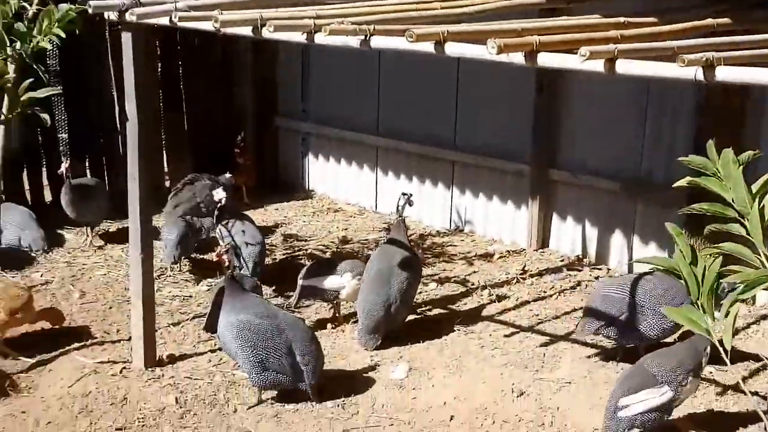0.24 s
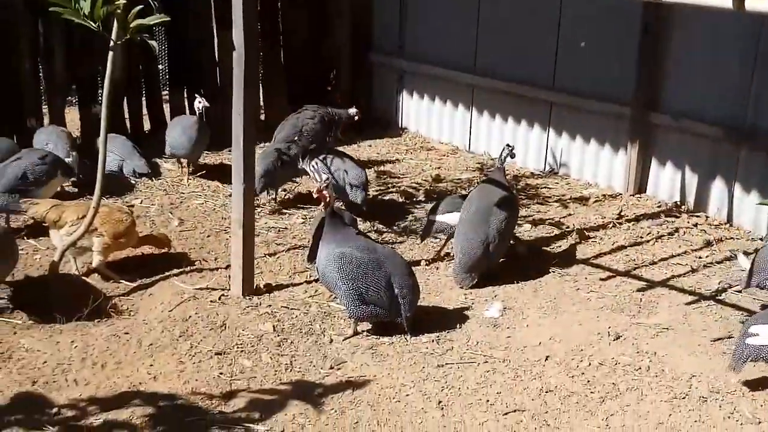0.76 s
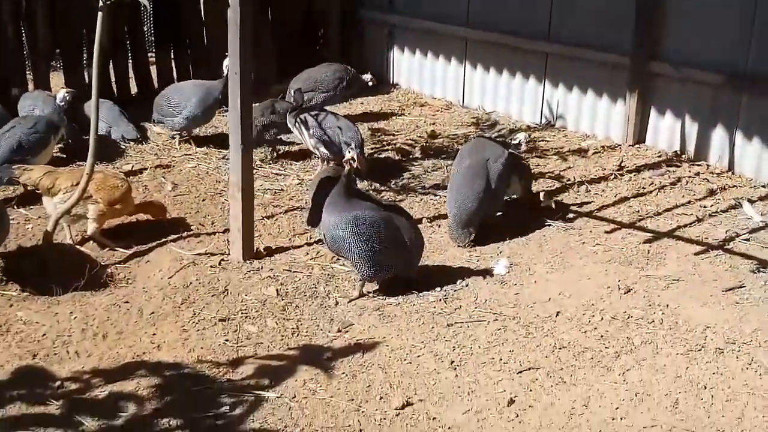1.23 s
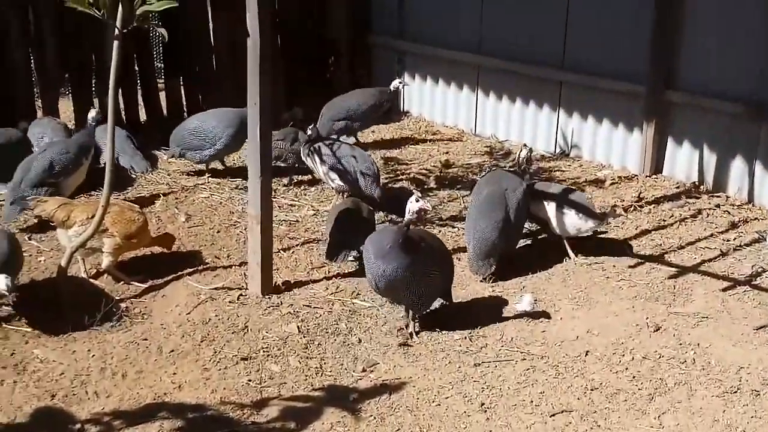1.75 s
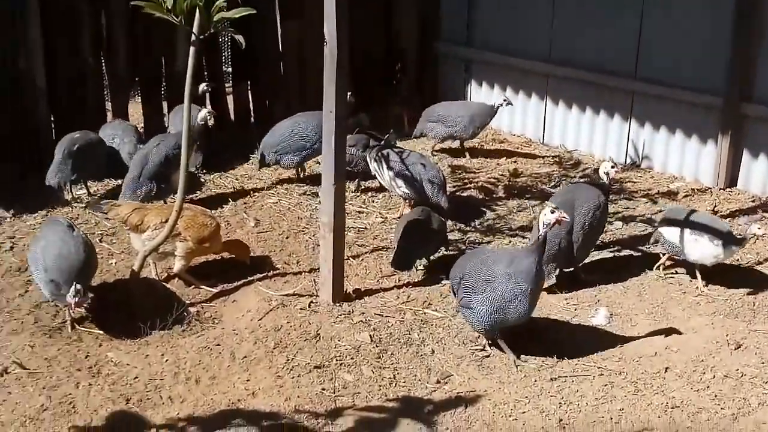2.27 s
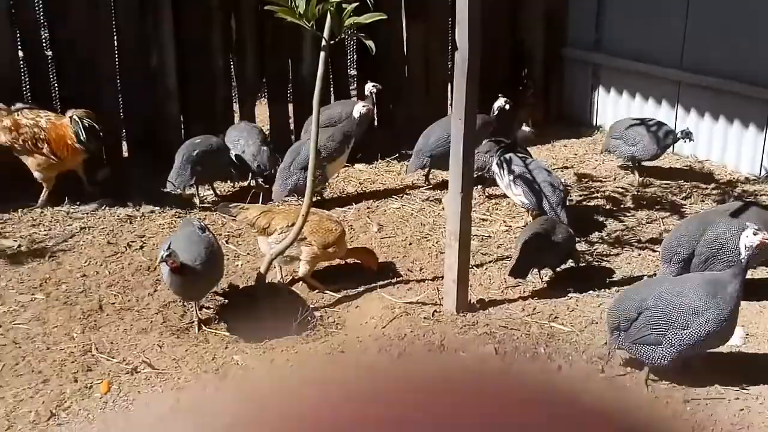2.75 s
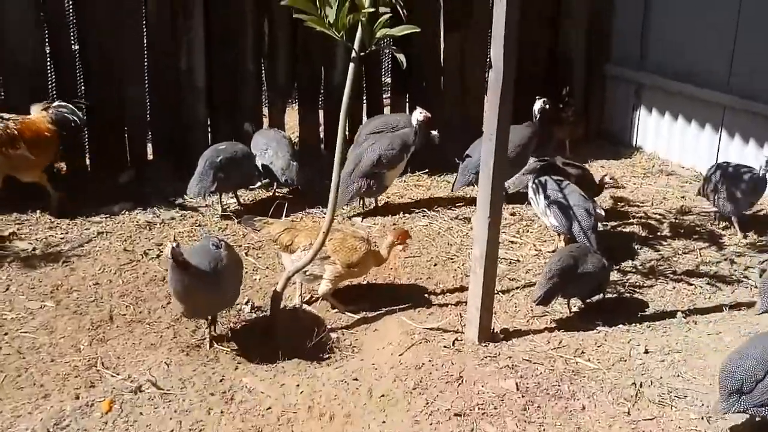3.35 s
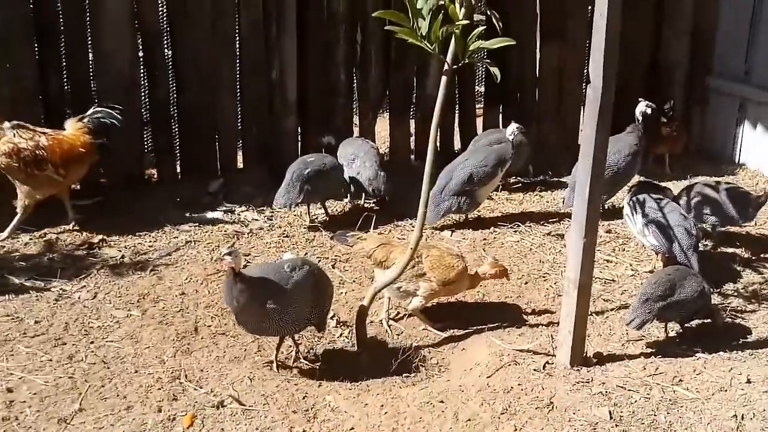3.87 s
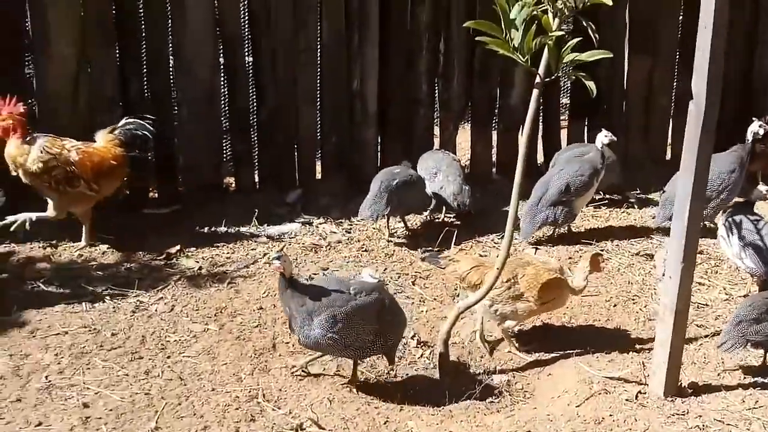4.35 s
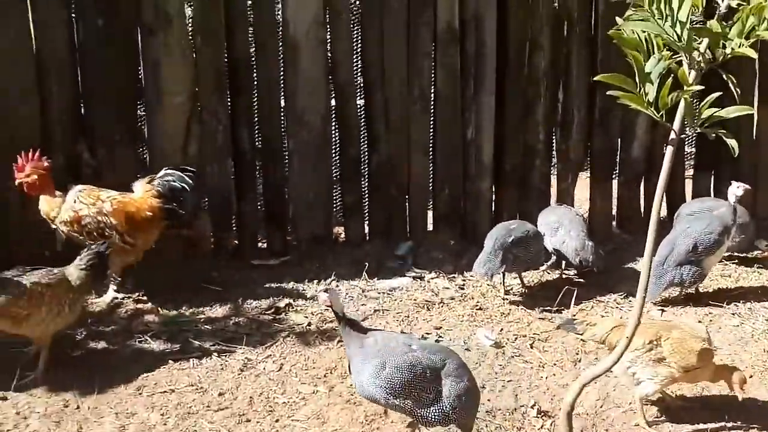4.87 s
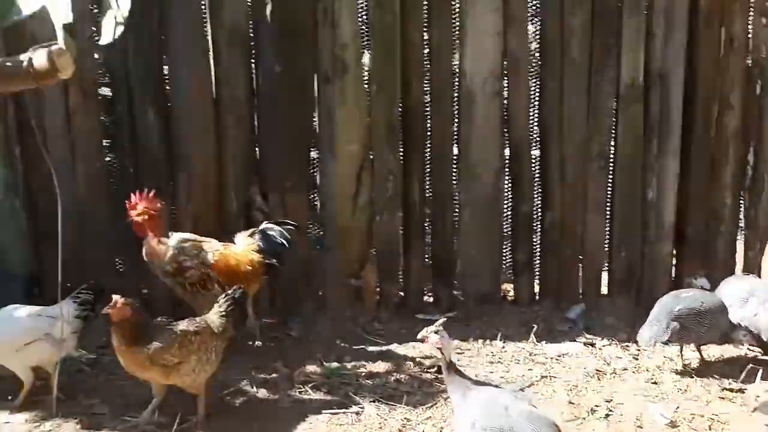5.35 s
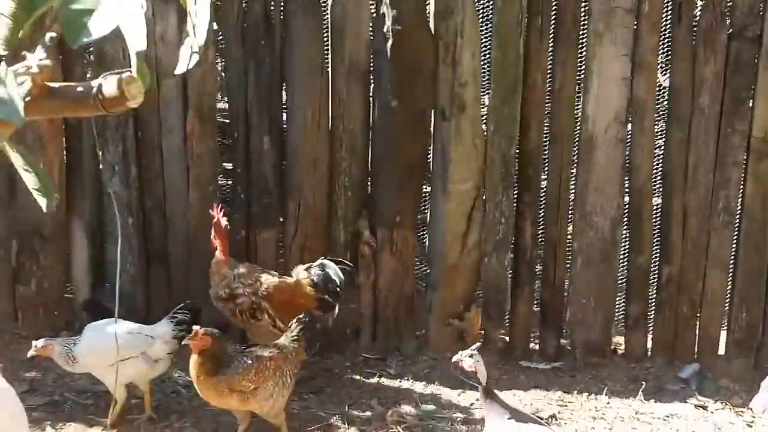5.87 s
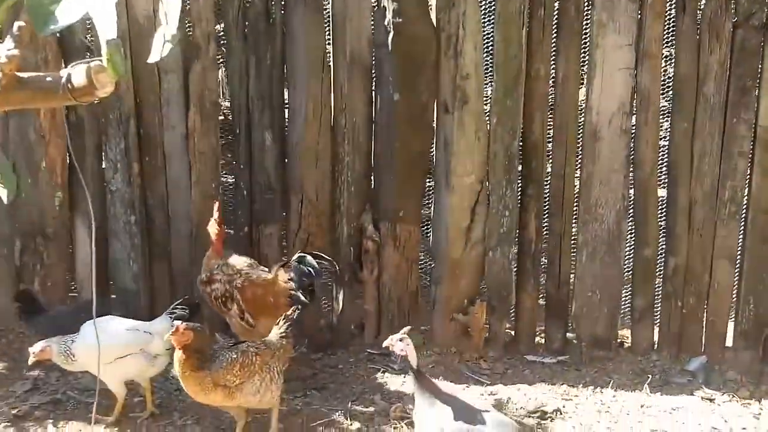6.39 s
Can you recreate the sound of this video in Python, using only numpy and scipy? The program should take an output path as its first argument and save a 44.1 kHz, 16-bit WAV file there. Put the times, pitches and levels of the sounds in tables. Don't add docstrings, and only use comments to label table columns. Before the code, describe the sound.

A guineafowl flock cackles nonstop in a fenced dirt yard, whistled syllables breaking into harsh rasps over faint hen clucks and light wind rumble.

```python
import sys
import numpy as np
from scipy import signal
from scipy.fft import rfft, irfft, next_fast_len
from scipy.io import wavfile
from scipy.ndimage import uniform_filter1d

SR = 44100
rng = np.random.default_rng(int(sys.argv[2]) if len(sys.argv) > 2 else 0)


def convert_level_to_amplitude(level_db):
    exponent = np.asarray(level_db, float) / 20
    return 10 ** exponent


def wav_out(sig):
    wavfile.write(sys.argv[1], SR, np.round(np.clip(np.atleast_2d(sig).T, -1, 1) * 32767).astype(np.int16))


N = 291942


def evened(x):
    return x / np.sqrt(np.mean(x ** 2) + 1e-20)


def read(points, hz):
    f, value = np.transpose(points)
    return np.interp(np.log(hz + 1), np.log(f + 1), value)


def add(mix, s, sound):
    part = mix[round(s * SR):][:len(sound)]
    part += sound[:len(part)]


def drift(count, hz):
    size = max(int(SR / hz), 1)
    smooth = uniform_filter1d(rng.standard_normal(count), size)
    return evened(uniform_filter1d(smooth, size))


def coloured(x, points):
    size = next_fast_len(len(x))
    gain = convert_level_to_amplitude(read(points, np.fft.rfftfreq(size, 1 / SR)))
    return irfft(rfft(x, size) * gain, size)[:len(x)]


def resonate(x, hz, width_hz):
    turn = np.exp(2j * np.pi * np.cumsum(hz * np.ones(len(x))) / SR)
    r = np.exp(-np.pi * abs(width_hz) / SR)
    low = signal.lfilter([(1 - r) ** 2], np.poly([r, r]), x / turn)
    return evened((turn * low).real)


def swell(length, rise, fall):
    t = np.arange(0, length + 3 * fall, 1 / SR)
    return t, np.clip(t / rise, 0, 1) * np.exp(-np.maximum(t - length + fall, 0) / fall)


def ring(s, length, hz, db, width_hz):
    t, shape = swell(length, 0.0061, 0.019)
    return max(s - .005, 0), convert_level_to_amplitude(db) * shape * resonate(rng.standard_normal(len(t)), hz, width_hz)


def sliding(s, length, start_hz, end_hz, db, width_hz):
    t, shape = swell(length, 0.0097, 0.017)
    pulses = rng.standard_normal(len(t)) * convert_level_to_amplitude(3.4 * drift(len(t), 133))
    hz = start_hz + (end_hz - start_hz) * np.minimum(t / length, 1)
    return s, convert_level_to_amplitude(db) * shape * resonate(pulses, hz, width_hz)


# (time [s], length [s], first pitch [Hz], last pitch [Hz], level [dB])
GLIDING_STARTS = [(0.07, 0.062, 1525, 1585, -13.5), (.365, 0.078, 1600, 1870, -19.5),
                  (0.889, 0.079, 1566, 1782, -16.5), (1.301, 0.09, 1530, 1586, -18.5),
                  (1.653, 0.072, 1489, 1540, -21), (1.992, 0.096, 1517, 1631, -14.5),
                  (2.655, 0.087, 1505, 1617, -11.5), (3.084, 0.046, 1605, 1505, -17.5),
                  (3.742, .1, 1511, 1683, -18.5), (3.894, 0.1, 1490, 1600, -12),
                  (4.002, 0.059, 1214, 1360, -27), (4.038, 0.12, 1378, 1628, -19),
                  (4.961, 0.12, 1390, 1629, -19), (5.175, 0.05, 1558, 1605, -17.5),
                  (5.544, 0.05, 1577, 1682, -15.5), (5.596, 0.032, 1614, 1584, -17),
                  (6.043, 0.059, 1542, 1670, -18), (6.57, 0.063, 1558, 1725, -18.5)]
# (time [s], length [s], pitch [Hz], level [dB])
HELD_STARTS = [(.7, 0.045, 1513, -20), (0.749, 0.035, 1587, -13), (.775, 0.072, 1512, -18.5),
               (1.027, 0.034, 1565, -19), (2.345, 0.03, 1514, -14.5), (2.44, 0.028, 1545, -14.5),
               (4.428, 0.022, 1482, -13.5), (4.492, 0.055, 1508, -19.5), (5.862, 0.046, 1652, -19.5),
               (6.521, 0.035, 1511, -15.5)]
# (time [s], length [s], first pitch [Hz], last pitch [Hz], level [dB])
NASAL_STARTS = [(0.307, 0.038, 1517, 1570, -23), (1.926, 0.05, 1550, 1700, -20.5),
                (2.986, 0.057, 1581, 1727, -21), (3.276, 0.071, 1488, 1602, -16.5),
                (3.48, 0.0605, 1572, 1638, -18.5), (5.696, 0.042, 1210, 1290, -21.5),
                (5.732, 0.11, 1390, 1563, -17)]


def whistles():
    droop_hz_per_s, plain_second_db, nasal_second_db = 350, -31, -23.5
    glides = [(*row, plain_second_db) for row in GLIDING_STARTS]
    nasal = [(*row, nasal_second_db) for row in NASAL_STARTS]
    held = [(s, length, hz, hz - droop_hz_per_s * length, db, plain_second_db)
            for s, length, hz, db in HELD_STARTS]
    return sorted(glides + nasal + held)


def beats(t, length):
    depth = 0.82 * np.clip(2.21 * t / length - 1.2, 0, 1)
    beat_hz = 75 * (1 + .3 * drift(len(t), 30))
    return 1 + depth * np.cos(2 * np.pi * np.cumsum(beat_hz) / SR)


# (multiple of the pitch [1], level [dB])
WHISTLE_OVERTONES = [(3, -20), (4, -33)]


def note(s, length, start_hz, end_hz, db, second_db, wobble, flutter_db, upper_db):
    t, shape = swell(length, 0.017, 0.009)
    hz = start_hz + (end_hz - start_hz) * np.minimum(t / length, 1)
    turns = np.cumsum(hz * (1 + wobble * drift(len(t), 146.0))) / SR
    tone = np.sin(2 * np.pi * turns) + convert_level_to_amplitude(second_db) * np.sin(4 * np.pi * turns)
    for k, over_db in WHISTLE_OVERTONES:
        level = convert_level_to_amplitude(over_db + upper_db + 3.6 * drift(len(t), 26.67))
        tone += level * np.sin(2 * np.pi * round(k) * turns)
    strength = convert_level_to_amplitude(db + flutter_db * drift(len(t), 103)) * shape * beats(t, length)
    return s - .006, np.sqrt(2) * tone * strength


def fourth(s, length, start_hz, end_hz, db):
    return note(s, length, 4 * start_hz, 4 * end_hz, db - 26.5, -60, wobble=.004, flutter_db=4, upper_db=-60)


def whistle_notes(out):
    for row in whistles():
        add(out, *note(*row, wobble=.004, flutter_db=1.4, upper_db=-.1))
    for row in NASAL_STARTS:
        add(out, *fourth(*row))


def chaos(per_s, spread_db, burst_db, burst_hz):
    clicks = (rng.random(N) < per_s / SR) * rng.choice([-1., 1.], N)
    size_db = spread_db * np.minimum(rng.exponential(1, N), 3)
    return clicks * convert_level_to_amplitude(size_db + burst_db * drift(N, burst_hz))


def breath(length, rise, db, start_db, fade_db):
    release_s, release_db = 0.067, -23
    rise = np.clip(rise, .002, 0.72 * length)
    hold = max(length - release_s, rise + .001)
    t = np.arange(0, hold + release_s, 1 / SR)
    knots = [0, 0.45 * rise, rise, hold, hold + release_s]
    levels_db = [start_db, 0.53 * start_db, 0, fade_db, fade_db + release_db]
    return np.minimum(t / 0.01, 1) * convert_level_to_amplitude(db + np.interp(t, knots, levels_db))


# (time [s], length [s], effort [dB], high ring [dB])
SHORT_CACKLES = [(0.0, .09, -37, -24), (0.022, 0.34, -27.5, -13.5), (0.588, 0.1682, -25.5, -11),
                 (2.112, 0.18, -24.5, -33), (2.839, 0.14, -34.5, -13.5), (4.242, 0.2, -28, -19),
                 (4.728, .07, -31.5, -44), (4.787, 0.19, -29.5, -44), (5.49, 0.1, -28, -41),
                 (5.593, 0.2, -27.5, -11), (6.255, .24, -31, -16.5)]
# (time [s], length [s], build-up [s], effort [dB], high ring [dB])
LONG_SYLLABLES = [(0.285, 0.28, 0.066, -27.5, -8.5), (0.682, 0.37, 0.12, -29.5, -16),
                  (0.952, 0.21, 0.032, -33, -16.5), (1.03, 0.24, 0.12, -26, -12.5),
                  (1.259, 0.34, 0.14, -27.5, -21), (1.64, 0.23, 0.047, -27.5, -15),
                  (1.93, 0.2, 0.04, -26.5, -28), (2.298, 0.13, 0.009, -37.5, -28),
                  (2.34, 0.28, 0.025, -27.5, -15), (2.627, .2, 0.059, -27, -23),
                  (2.984, 0.24, 0.044, -25.5, -12), (3.265, 0.22, 0.04, -27.5, -22),
                  (3.478, 0.19, 0.081, -32, -17), (3.692, 0.29, 0.016, -28.5, -17),
                  (3.894, 0.31, 0.12, -30, -36), (4.416, 0.26, 0.073, -28, -9.5),
                  (4.962, 0.24, 0.11, -29, -15), (5.118, 0.32, 0.18, -25.5, -20),
                  (5.701, 0.19, 0.091, -24.5, -46), (5.796, .22, 0.027, -26.5, -13),
                  (6.031, 0.18, 0.11, -27.5, -23), (6.51, 0.16, 0.13, -28, -14)]
# (time [s], length [s], level [dB])
THROAT_RINGS = [(0.055, 0.21, -13), (0.349, 0.18, -14), (0.705, 0.15, -10.5), (0.867, 0.38, -19.5),
                (1.3, 0.29, -15), (1.647, 0.25, -15.5), (1.946, 0.3, -19), (2.346, 0.27, -20.5),
                (2.635, 0.32, -19.5), (2.984, 0.28, -19), (3.264, 0.24, -14), (3.477, 0.17, -17),
                (3.721, 0.23, -13.5), (3.884, 0.35, -15.5), (4.42, 0.24, -18), (4.951, 0.4, -16.5),
                (5.528, 0.17, -12), (5.71, 0.28, -9), (6.042, 0.16, -15), (6.252, 0.21, -30.5),
                (6.523, 0.36, -19.5)]


def efforts():
    effort, high, throat = np.zeros((3, N))
    for s, length, db, _ in SHORT_CACKLES:
        add(effort, s, breath(length, 0.024, db, start_db=-16, fade_db=-14.5))
    for s, length, rise, db, _ in LONG_SYLLABLES:
        add(effort, s, breath(length, rise, db, start_db=-16, fade_db=-6))
    for s, length, *_, high_db in list(SHORT_CACKLES) + list(LONG_SYLLABLES):
        add(high, s, breath(length, 0.022, high_db, start_db=-7.5, fade_db=-18.5))
    for s, length, db in THROAT_RINGS:
        add(throat, s, breath(length, 0.046, db, start_db=-7, fade_db=-5.5))
    return uniform_filter1d([effort, high + convert_level_to_amplitude(0.5) * effort, throat], size=150)


def whistle_course(t):
    s, length, start_hz, end_hz = np.transpose(whistles())[:4]
    latest = np.maximum(np.searchsorted(s, t) - 1, 0)
    glide = np.clip((t - s[latest]) / length[latest], 0, 1.6)
    pitch_hz = start_hz[latest] + (end_hz - start_hz)[latest] * np.minimum(glide, 1)
    return pitch_hz, glide, np.maximum(t - s[latest] - length[latest], 0)


# (from [s], to [s])
SOLO_SPANS = [
    (0.069, 0.12),
    (.88, 0.95),
    (1.299, 1.373),
    (1.991, 2),
    (2.65, 2.75),
    (3.475, 3.5),
    (3.89, 3.97),
    (5.542, 5.64),
    (5.721, 5.87),
    (6.04, 6.17),
]


def solo(t):
    return uniform_filter1d(sum(1. * ((t > a) & (t < b)) for a, b in SOLO_SPANS), size=500)


def patchy(x, patch_db):
    z = signal.stft(x, nperseg=512)[2]
    field = rng.standard_normal(z.shape[::-1]).T
    field = uniform_filter1d(field, size=3, axis=0)
    field = evened(uniform_filter1d(field, size=8, axis=1))
    return evened(signal.istft(z * convert_level_to_amplitude(patch_db * field), nperseg=512)[1][:N])


# (frequency [Hz], width [Hz], level [dB])
WINDPIPE_MODES = [(345, 40, -35), (1000, 60, -20), (3300, 250, -18), (6350, 400, -15)]


def windpipe(slaps):
    return sum(convert_level_to_amplitude(db) * resonate(slaps, hz * (1 + 0.051 * drift(N, 7.4)), width_hz)
               for hz, width_hz, db in WINDPIPE_MODES)


def throat_ring(slaps, other, pitch_hz, after_s):
    climb_hz, climb_s, rest_hz = 129, 0.076, 1525
    after = after_s / climb_s
    arch_hz = pitch_hz + climb_hz * after * np.exp(1 - after)
    led = resonate(other, arch_hz * (1 + 0.016 * drift(N, 14)), 210)
    resting = resonate(slaps, rest_hz * (1 + 0.023 * drift(N, 18)), 200)
    return convert_level_to_amplitude(-4.0) * led + convert_level_to_amplitude(-11) * resting


def high_ring(slaps, t, pitch_hz, alone):
    base_hz, opening_hz_per_s, opening_s = 4604, 1650, 0.083
    starts = np.sort([row[0] for row in list(SHORT_CACKLES) + list(LONG_SYLLABLES)])
    latest = starts[np.maximum(np.searchsorted(starts, t) - 1, 0)]
    hz = base_hz + opening_hz_per_s * np.clip(t - latest, 0, opening_s)
    high = patchy(resonate(slaps, hz * (1 + 0.026 * drift(N, 43.0)), 810), patch_db=4.5)
    third = np.sqrt(2) * np.sin(6 * np.pi * np.cumsum(pitch_hz) / SR)
    return (1 - .7 * alone) * high + .5 * alone * third * convert_level_to_amplitude(3 * drift(N, 60))


# (from [s], to [s], dip [dB])
WHISTLE_HOLLOWS = [(.255, 0.34, -7), (0.692, 0.804, -8.5), (.88, 0.96, -5), (1.275, 1.38, -12),
                   (1.638, 1.663, -6), (1.687, 1.757, -5), (1.92, 1.947, -14), (2.98, 2.997, -7),
                   (3.26, 3.275, -9), (2.023, 2.108, -5.5), (2.3, 2.35, -7.5), (2.594, 2.674, -15),
                   (3.47, 3.53, -13), (3.9, 3.975, -12), (4.966, 5.07, -7.5), (5.13, 5.245, -4),
                   (5.508, 5.603, -11), (5.707, 5.835, -14), (6.029, 6.1, -11), (6.51, 6.58, -7)]
# (low edge [Hz], high edge [Hz])
HOLLOW_BAND = (2330, 4320)


def hollowed(x):
    t = np.arange(N) / SR
    dip_db = sum(min(db, 0) * ((t > a) & (t < b)) for a, b, db in WHISTLE_HOLLOWS)
    dip_db = uniform_filter1d(dip_db, size=400)
    band = signal.butter(3, HOLLOW_BAND, "band", fs=SR, output="sos")
    return x - (1 - convert_level_to_amplitude(dip_db)) * signal.sosfiltfilt(band, x)


# (frequency [Hz], level [dB])
RASP_COLOUR = [(200, -19), (450, -15.5), (800, -7.5), (1300, -2), (2500, 5), (3900, 0), (5600, 3.5),
               (6500, -7), (7400, -20.5), (16000, -29)]


def rasp():
    t = np.arange(N) / SR
    effort, high_gain, throat_gain = efforts()
    pitch_hz, glide, after_s = whistle_course(t)
    clean = uniform_filter1d(1. * ((glide > 0) & (glide < 1)), size=700)
    alone = solo(t)
    throat_db = -5.0 * clean - 10.5 * alone
    slaps = chaos(3400, spread_db=2.5, burst_db=2.7, burst_hz=260)
    other = chaos(1500, spread_db=2.5, burst_db=2.5, burst_hz=90)
    broad = patchy(coloured(slaps, RASP_COLOUR), patch_db=4.4) + windpipe(slaps)
    broad *= convert_level_to_amplitude(-7 * alone)
    throat = throat_ring(slaps, other, pitch_hz, after_s)
    beak = resonate(other, 1980 * (1 + 0.052 * drift(N, 14.8)), 184)
    high = high_ring(slaps, t, pitch_hz, alone)
    calls = effort * (convert_level_to_amplitude(5.5) * broad + convert_level_to_amplitude(-4.0) * beak)
    throaty = throat + convert_level_to_amplitude(-16.5) * (1 - clean) * beak
    return hollowed(calls + convert_level_to_amplitude(-11.0) * high_gain * high) + throat_gain * convert_level_to_amplitude(throat_db - 1.0) * throaty


# (time [s], length [s], first [Hz], last [Hz], level [dB])
THROAT_BREAKS = [(0.032, .06, 2040, 2140, -29), (0.158, 0.044, 1756, 1810, -26.5),
                 (.44, .035, 1840, 2050, -27), (0.338, .16, 1510, 1640, -26.5),
                 (0.788, .05, 1960, 1940, -21.5), (.81, 0.069, 2130, 2110, -27),
                 (0.962, 0.035, 1920, 1880, -20), (.98, 0.036, 1500, 1490, -19),
                 (1.07, 0.06, 1506, 1490, -20), (1.134, 0.083, 1800, 1790, -24.5),
                 (1.409, 0.095, 1664, 1827, -22), (1.4, 0.046, 2165, 2170, -24),
                 (1.731, 0.061, 1670, 1670, -20), (1.971, 0.033, 1650, 1800, -21),
                 (2.487, 0.083, 1640, 1690, -22.5), (2.738, 0.055, 1690, 1730, -23),
                 (3.059, .04, 1950, 1950, -25), (3.12, 0.082, 1820, 1840, -30),
                 (3.335, .07, 1620, 1800, -20), (3.518, 0.037, 1658, 1764, -21.5),
                 (3.978, 0.089, 1506, 1670, -18), (4.11, 0.047, 1840, 1860, -22),
                 (4.139, 0.047, 2040, 2070, -27.5), (4.537, 0.11, 1880, 1904, -28),
                 (4.51, 0.091, 1615, 1670, -22.5), (5.09, 0.036, 1996, 2025, -25.5),
                 (5.075, 0.083, 1607, 1523, -19), (5.29, 0.087, 2160, 2050, -28),
                 (5.628, 0.036, 1930, 1960, -27.5), (5.88, 0.11, 1487, 1501, -27.5),
                 (5.919, 0.086, 1950, 1830, -27.5), (6.079, 0.037, 1635, 1736, -19),
                 (6.126, 0.056, 1855, 1905, -27.5)]


def throat_breaks(out):
    for row in THROAT_BREAKS:
        add(out, *sliding(*row, width_hz=95))


# (time [s], length [s], first [Hz], last [Hz], level [dB])
BEAK_BLAZES = [(0.979, 0.09, 4600, 4750, -22.5), (1.311, 0.072, 4800, 4950, -26),
               (1.648, .11, 4500, 4950, -22), (1.941, 0.084, 4850, 4670, -27.5),
               (2.36, 0.093, 4750, 4770, -26.5), (2.854, 0.066, 4930, 4630, -33.5),
               (3.002, 0.13, 4580, 5020, -25), (3.535, 0.068, 4870, 4700, -27),
               (3.681, 0.16, 4460, 4980, -24), (4.42, 0.085, 4470, 4680, -23),
               (5.131, 0.09, 4780, 4940, -21), (5.27, .08, 3700, 4500, -26), (1.13, .06, 4100, 4900, -26),
               (5.501, 0.089, 4900, 5470, -33.5), (5.81, .11, 4550, 4600, -25.5),
               (6.517, 0.074, 4480, 4840, -24.5)]


def beak_blazes(out):
    for row in BEAK_BLAZES:
        add(out, *sliding(*row, width_hz=450))


# (time [s], length [s], first [Hz], last [Hz], level [dB])
UPPER_PARTIALS = [(0.922, 0.027, 3180, 3390, -34), (0.93, 0.037, 5500, 5670, -27),
                  (0.898, 0.047, 4820, 4910, -35), (1.266, .04, 4560, 4100, -37),
                  (1.418, 0.031, 4053, 4080, -25.5), (.225, 0.052, 5310, 5300, -32),
                  (1.638, .014, 5280, 5250, -28), (1.92, .02, 5050, 5150, -34),
                  (2.983, .016, 5150, 5900, -25), (2.402, 0.034, 5160, 4700, -26),
                  (2.519, 0.041, 2000, 1950, -25), (2.652, .055, 4610, 5100, -35),
                  (2.65, .05, 5000, 5000, -30), (3.475, 0.035, 4780, 4840, -25),
                  (3.48, 0.03, 3140, 3150, -36), (3.482, 0.031, 6360, 7200, -44),
                  (5.58, 0.06, 3690, 3690, -28), (5.3, 0.039, 2400, 2600, -31),
                  (5.74, 0.074, 2700, 3060, -31), (5.745, 0.0724, 5800, 7000, -35),
                  (6.3, 0.046, 4900, 5020, -27), (5.739, 0.049, 5290, 5430, -31),
                  (5.795, 0.06, 4230, 4350, -24), (6.105, 0.066, 3700, 4350, -36),
                  (6.344, 0.094, 4686, 4590, -31)]


def upper_partials(out):
    for row in UPPER_PARTIALS:
        add(out, *sliding(*row, width_hz=55))


# (time [s], length [s], frequency [Hz],
# level [dB])
HELD_MODES = [(0.029, 0.082, 2094, -26), (0.617, 0.06, 2120, -22), (0.693, 0.06, 4650, -22.5),
              (1.465, 0.079, 3750, -34.5), (2.057, 0.057, 2006, -24.5), (2.107, 0.028, 2600, -24),
              (2.198, 0.033, 4620, -22.5), (2.689, 0.043, 2204, -24), (2.92, 0.095, 1124, -47),
              (3.029, 0.031, 2144, -20.5), (3.528, 0.048, 3640, -28), (3.693, 0.06, 2147, -24.5),
              (3.965, 0.049, 1940, -24), (4.255, 0.085, 2028, -22.5), (4.488, 0.052, 2153, -24),
              (4.645, 0.085, 774, -48), (4.9, .05, 727, -49), (4.97, 0.067, 884, -43),
              (3.476, .05, 890, -46), (4.733, 0.0351, 2380, -32.5), (4.792, 0.0274, 2410, -19.5),
              (4.976, 0.083, 4800, -26.5), (5.017, 0.071, 3060, -37), (5.153, 0.037, 90, -31),
              (5.497, 0.038, 2320, -26), (5.594, 0.056, 4780, -26.5), (6.038, 0.098, 5200, -32),
              (6.08, 0.052, 3610, -30.5), (6.25, 0.065, 2770, -26.5), (6.267, 0.078, 2130, -27.5),
              (6.557, 0.0978, 2250, -34)]


def held_modes(out):
    for row in HELD_MODES:
        add(out, *ring(*row, width_hz=.04 * row[2]))


# (time [s], level [dB], frequency [Hz])
PIPE_LOWEST = [(0.215, -31.5, 358), (0.422, -39, 330), (0.599, -37, 344), (0.819, -36.5, 357),
               (1.129, -35, 366), (1.412, -37, 354), (2.181, -39, 305.3), (2.458, -39, 320),
               (2.85, -31, 316), (3.019, -35.5, 362), (3.302, -32.5, 352), (3.381, -36, 345),
               (3.549, -37.5, 307), (3.686, -34.5, 358), (3.857, -35, 296), (4.282, -36.5, 310),
               (4.49, -38, 350), (4.972, -41.5, 297.5), (5.158, -39, 345), (5.261, -30.5, 356),
               (5.877, -34.5, 351.4), (6.27, -34, 353), (6.338, -28.5, 303.4), (6.421, -42, 365)]
# (time [s], level [dB])
PIPE_TRIPLE = [(0.134, -31.5), (0.2153, -23.5), (0.392, -38), (0.4605, -24), (0.7824, -23.5),
               (0.966, -25.5), (1.087, -27), (1.496, -26), (2.0607, -24.5), (2.4016, -46), (2.525, -28.5),
               (2.724, -26), (3.0478, -25), (3.3634, -26.5), (3.5536, -22), (3.84, -24), (4.004, -27),
               (4.2566, -21.5), (4.579, -26), (5.0952, -23), (5.622, -27.5), (5.8334, -22), (5.9225, -26.5),
               (6.1158, -28.5), (6.545, -28.5)]


def pipe_modes(out):
    for s, db, hz in PIPE_LOWEST:
        add(out, *ring(s, .052, hz, db - 6.5, width_hz=38))
    for s, db in PIPE_TRIPLE:
        add(out, *ring(s, 0.052, 1003.7, db - 7.5, width_hz=85))


def snap(s, hz, db):
    width_hz, slide_hz_per_s = 1520, 18600
    t, shape = swell(0.046, 0.007, 0.038)
    clicks = rng.standard_normal(len(t)) * convert_level_to_amplitude(3.6 * rng.standard_normal(len(t)))
    slide = slide_hz_per_s * t
    up, down = resonate(clicks, hz + slide, width_hz), resonate(clicks, hz - slide, width_hz)
    return s, convert_level_to_amplitude(db) * shape * (up + 0.27 * down)


# (time [s], frequency [Hz], level [dB])
BEAK_SNAPS = [
    (0.026, 2980, -23.5),
    (0.58, 2850, -24),
    (2.11, 2870, -25.5),
    (3.277, 3180, -26),
    (3.678, 3130, -21),
    (4.249, 2860, -24.5),
    (4.792, 3360, -18.5),
    (5.495, 2447, -43),
    (6.25, 2840, -23.5),
]


def beak_snaps(out):
    for row in BEAK_SNAPS:
        add(out, *snap(*row))


# (time [s], length [s], first pitch [Hz], last pitch [Hz], level [dB])
HEN_NOTES = [(0.034, 0.0384, 1304, 1290, -29.5), (0.215, 0.037, 1289, 1382, -27.5),
             (0.526, 0.043, 1270, 1176, -34.5), (0.729, 0.15, 1268, 1260, -39),
             (1.297, 0.12, 1307, 1303, -25.5), (1.792, 0.046, 1300, 1142, -27),
             (2.194, 0.052, 1187, 1320, -33), (2.466, 0.028, 1197, 1250, -27.5),
             (2.625, 0.062, 1214, 1270, -24), (4.727, 0.045, 1332, 1346, -27),
             (4.868, 0.062, 1208, 1307, -35), (5.383, 0.061, 1298, 1228, -31), (5.5, 0.05, 1290, 1360, -32),
             (5.926, 0.13, 1280, 1260, -37.5), (6.338, 0.054, 1252, 1230, -31),
             (6.397, 0.066, 1270, 1279, -31.5), (6.521, 0.017, 1250, 1190, -24)]


def hen_notes(out):
    for row in HEN_NOTES:
        add(out, *note(*row, -21, wobble=.03, flutter_db=4.5, upper_db=-22))


# (multiple of the pitch [1], level [dB])
CLUCK_PARTIALS = [(1, 2), (2, -7.5), (3, 7.5), (4, 13), (5, 6)]


def cluck(s, db):
    t, shape = swell(0.046, 0.016, 0.016)
    turns = np.cumsum(245 + 2600 * t + 9.8 * drift(len(t), 230)) / SR
    stack = sum(convert_level_to_amplitude(over_db) * np.sin(2 * np.pi * round(k) * turns) for k, over_db in CLUCK_PARTIALS)
    return s, convert_level_to_amplitude(db) * shape * stack


# (time [s], level [dB])
HEN_CLUCKS = [
    (0.516, -44.5),
    (0.725, -50),
    (1.256, -42),
    (2.29, -44.5),
    (2.823, -42.5),
    (4.353, -42),
    (4.865, -48),
    (5.383, -44),
]


def hen_clucks(out):
    for row in HEN_CLUCKS:
        add(out, *cluck(*row))


def tones():
    out = np.zeros(N)
    for source in (whistle_notes, throat_breaks, beak_blazes, upper_partials, held_modes,
                   pipe_modes, beak_snaps, hen_notes, hen_clucks):
        source(out)
    return out


# (frequency [Hz], time to fall 60 dB [s])
PEN_DECAY = [(300, 0.14), (1500, 0.13), (5000, 0.097), (12000, 0.072)]


def pen(x):
    taps = np.zeros(SR // 2)
    at = np.arange(300, SR // 2 - 20, 20)
    taps[at + rng.integers(0, 20, len(at))] = rng.choice([-1., 1.], len(at))
    hz, t, z = signal.stft(taps, SR, nperseg=256)
    t60 = np.maximum(read(PEN_DECAY, hz), .02)[:, None]
    tail = signal.istft(z * convert_level_to_amplitude(-60 * t / t60), SR, nperseg=256)[1]
    return signal.fftconvolve(x, tail / np.linalg.norm(tail))[:N]


# (time [s], level [dB])
WIND_GUSTS = [(0.0, -40), (0.28, -55), (0.35, -48), (0.96, -53), (1.18, -46.5), (1.25, -50.5),
              (3.61, -55.5), (3.7, -43.5), (3.93, -61.5), (4.85, -45.5), (5.02, -92), (5.16, -39),
              (5.45, -47), (5.79, -57.5), (6.62, -46.5)]
# (frequency [Hz], level [dB])
WIND_COLOUR = [(20, -12), (60, 5), (120, -5.5), (250, 1.5), (600, -1), (4000, -14)]


def wind(harsh):
    gate = np.clip(uniform_filter1d(abs(harsh), size=1500) / 0.011, .25, 1.4)
    level_db = np.interp(np.arange(N) / SR, *np.transpose(WIND_GUSTS))
    rumble = evened(coloured(rng.standard_normal(N), WIND_COLOUR))
    return gate * convert_level_to_amplitude(level_db + 4 * drift(N, 14)) * rumble


def distant_chatter():
    return convert_level_to_amplitude(-53) * evened(coloured(rng.standard_normal(N), RASP_COLOUR))


def scene():
    notes, harsh = tones(), rasp()
    echoes = pen(convert_level_to_amplitude(-5.5) * notes + convert_level_to_amplitude(-5.0) * harsh)
    return (notes + harsh + echoes + wind(harsh) + distant_chatter())[None]


# (frequency [Hz], level [dB])
TREBLE_COPIES = [(7000, -19.5), (8500, -22), (10800, -11.5), (10900, -25), (12500, -26.5), (14700, -13.5),
                 (14800, -32), (16000, -23.5)]


def copied_treble(x):
    split_hz, step_hz = 7000, 3870
    size = next_fast_len(N)
    z, hz = rfft(x, size), np.fft.rfftfreq(size, 1 / SR)
    split, step = np.searchsorted(hz, [split_hz, step_hz])
    source = split - step + np.arange(len(hz) - split) % step
    z[split:] += z[source] * convert_level_to_amplitude(read(TREBLE_COPIES, hz[split:]))
    return irfft(z, size)[:N]


def top_cut(x):
    return signal.sosfilt(signal.butter(12, 16480, fs=SR, output="sos"), x)


def record(dry):
    limited = copied_treble(0.83 * np.tanh(dry[0] / .9))[None]
    edge = signal.firwin(301, 15900, window=("kaiser", 9), fs=SR)
    mix = signal.oaconvolve(limited, edge[None], "same")
    return top_cut(mix)


dry = scene()
out = record(dry)
wav_out(out)
```